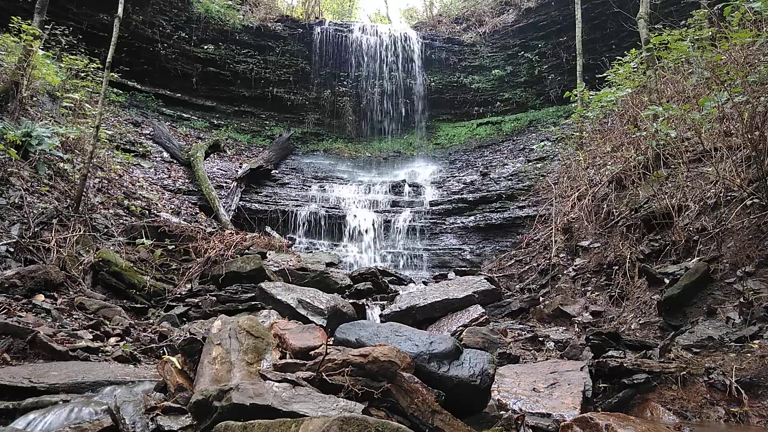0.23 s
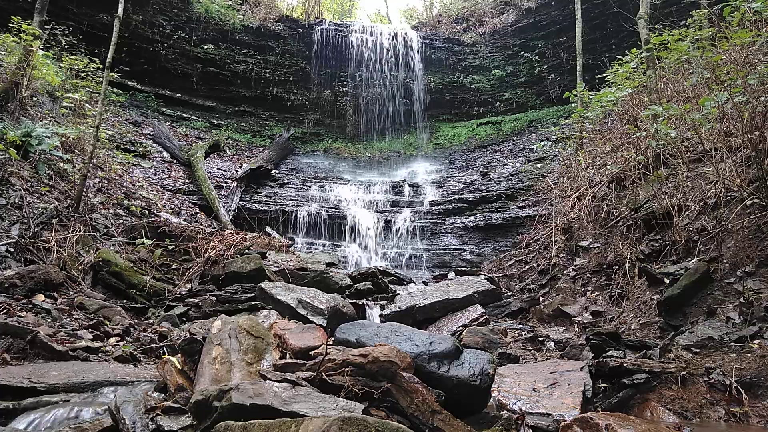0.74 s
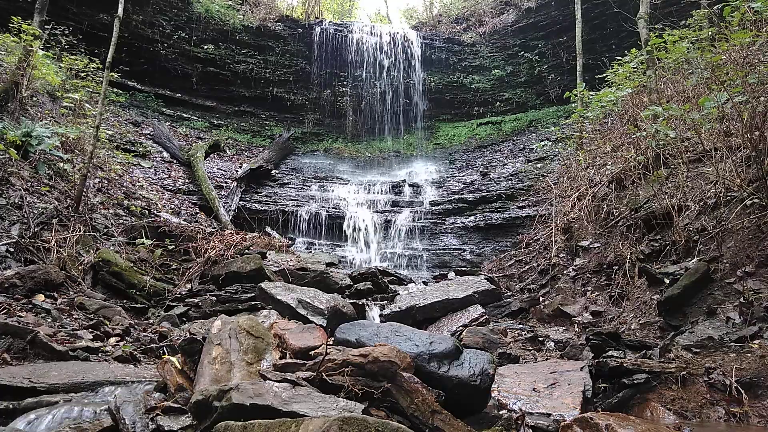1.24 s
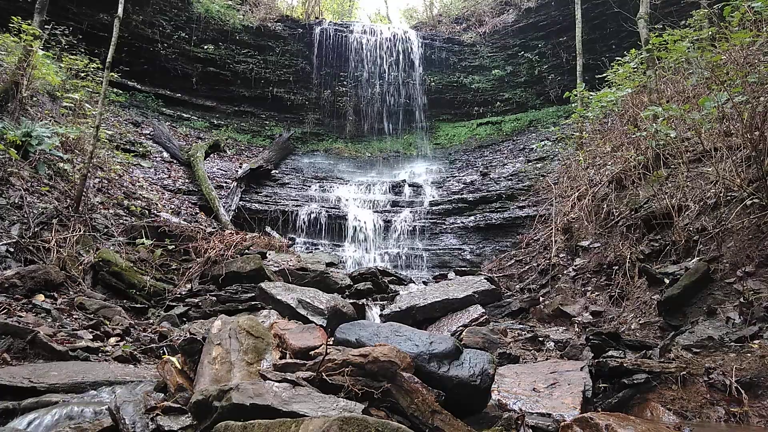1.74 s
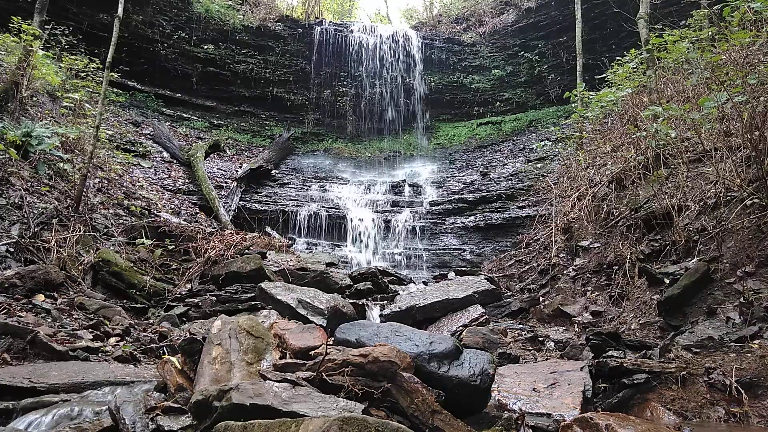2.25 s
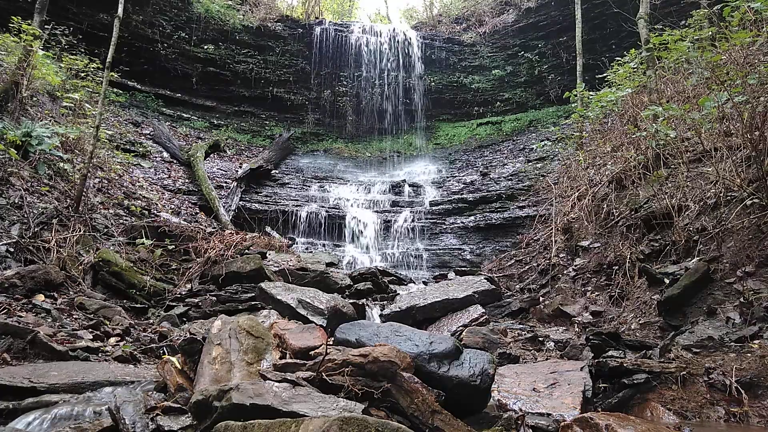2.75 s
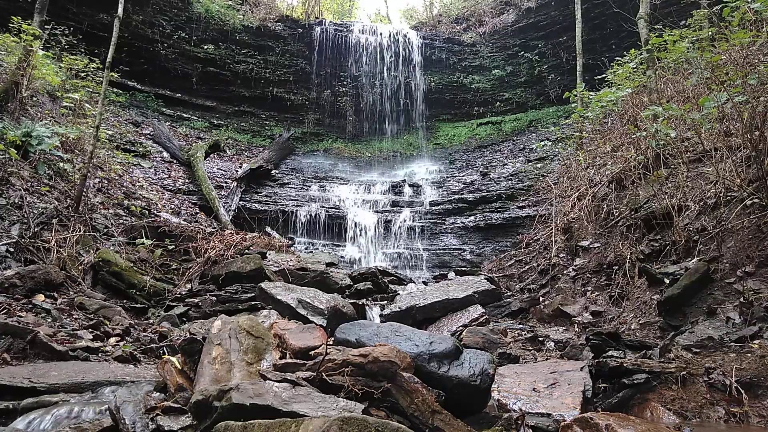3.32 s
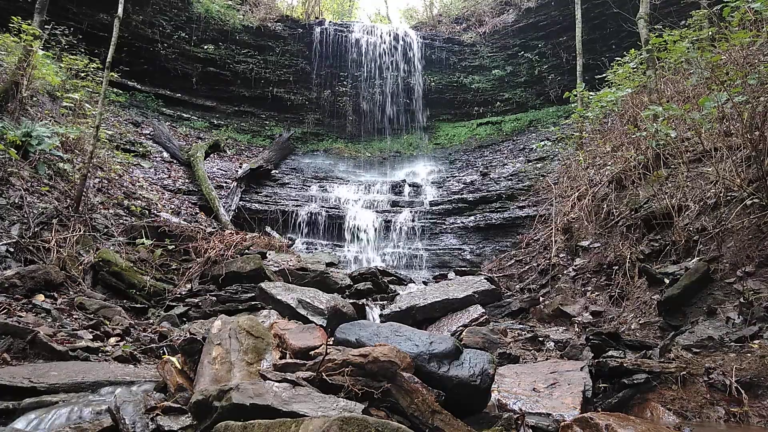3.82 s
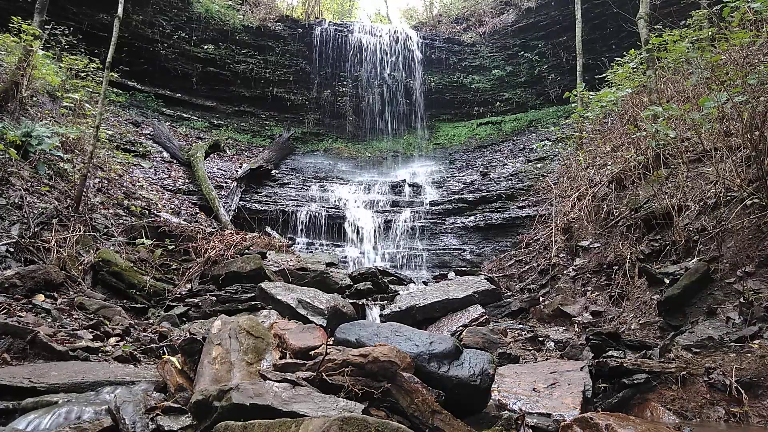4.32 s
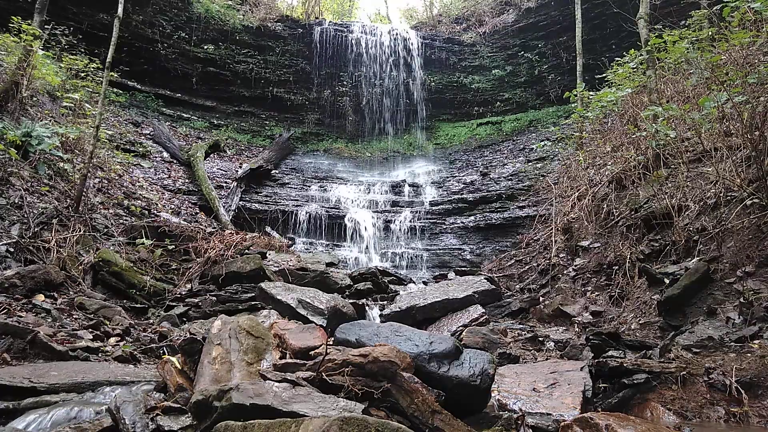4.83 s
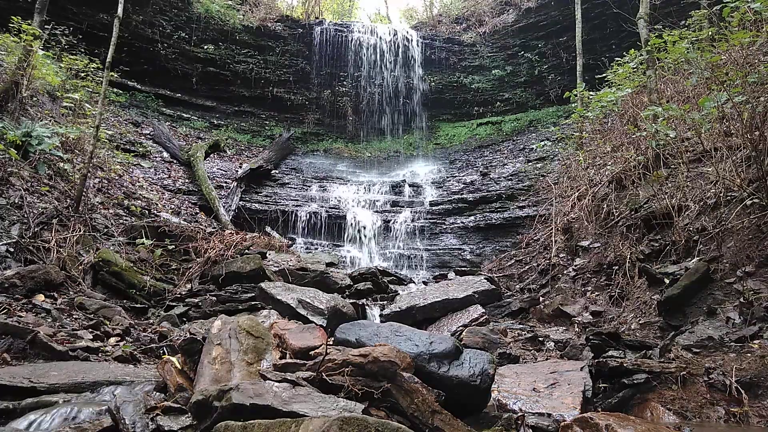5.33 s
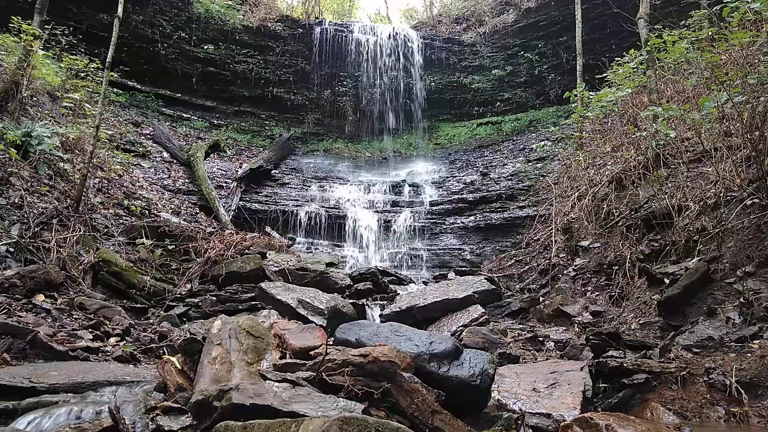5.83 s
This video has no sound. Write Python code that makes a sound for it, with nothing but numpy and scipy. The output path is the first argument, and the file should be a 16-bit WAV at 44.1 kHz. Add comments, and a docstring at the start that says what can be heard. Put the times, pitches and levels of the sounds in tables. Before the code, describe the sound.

A small waterfall splashing on rock ledges starts with a short, loud surge of noise, then quickly sinks to a soft, steady rush that lasts to the end. Faint bubbling and scattered low and high gurgles from a nearer brook come through the hiss. The place is a rocky hollow in the woods, heard in mono through one small microphone with a sharp treble.

```python
"""A steady rush of water cuts in; its volume swells for a moment, then sinks to a much quieter, steady level.
It is a small waterfall some way off, where countless splashes on rock ledges blend into a hiss. Nearer, a brook
gurgles between stones as pockets of air ring in the water. One small microphone with a sharp treble resonance
hears it all."""
import sys
import numpy as np
from scipy import signal
from scipy.io import wavfile

SR = 44100
rng = np.random.default_rng(int(sys.argv[2]) if len(sys.argv) > 2 else 0)


def file_out(sig):
    """Save sig as 16-bit WAV at sys.argv[1]."""
    # one column per channel
    cols = np.atleast_2d(sig).T
    # limit, then scale
    lim = np.clip(cols, -1, 1)
    pcm = np.round(lim * 32767).astype(np.int16)
    wavfile.write(sys.argv[1], SR, pcm)


N = 267422
TIME = np.arange(N) / SR
START_S = 0.07   # silence until here


def waterfall(level_db, surge_db, patchy_db):
    """Countless splashes blur into bands of noise that surge together; low bands come in patches."""
    # tone of the splashes: (frequency [Hz], relative level [dB])
    splash_tone = [(20, -26), (55, -18), (100, -13), (160, -2.5), (215, -11.5), (300, -7), (430, -10.5),
                   (600, -8.5), (1300, -9), (2500, -11.5), (4500, -14.5), (7000, -14), (9200, -17.5),
                   (17000, -17.5)]
    tone_hz, tone_db = np.array(splash_tone).T
    edges_hz = 20 * 2 ** np.arange(0, 9.9, 1 / 3)   # three bands to an octave
    out, surge = 0, drift(4.0)
    noise = rng.standard_normal((2, N))   # neighbouring bands get unrelated noise
    for k, (low, high) in enumerate(zip(edges_hz, edges_hz[1:])):
        band = signal.sosfilt(signal.butter(2, [low, high], "band", fs=SR, output="sos"), noise[k % 2])
        hz = np.sqrt(low * high)
        band_db = np.interp(np.log(hz), np.log(tone_hz), tone_db)
        patch_db = patchy_db / (1 + hz / 1500) * drift(13.6)
        out = out + from_db(band_db + surge_db * surge + patch_db) * band
    return from_db(level_db) * rms_one(out)


def brook_glugs(weak_count, weak_db, low_hz, high_hz):
    """Each glug is a clump of bubbles of similar size; weaker glugs come at random."""
    # the loudest air pockets in the brook: (time [s], pitch [Hz], main bubble's peak level [dB])
    loud_glugs = [(0.92, 775, -46), (0.933, 1110, -45), (1.48, 275, -45), (1.532, 290, -51),
                  (1.632, 602, -43), (1.759, 285, -50), (2.088, 834, -42), (2.092, 1012, -46),
                  (2.176, 536, -40), (2.242, 516, -44), (2.27, 520, -49), (2.296, 473, -48),
                  (2.323, 336, -50), (2.434, 301, -47), (2.623, 296, -49), (2.629, 470, -50),
                  (2.67, 496, -49), (2.718, 500, -51), (2.765, 1530, -46), (2.938, 322, -48),
                  (3.591, 573, -43), (3.77, 910, -45), (3.955, 600, -49), (4.128, 283, -43),
                  (4.194, 193, -48), (4.228, 285, -43), (4.711, 904, -45), (4.75, 151, -50),
                  (4.802, 150, -48.5), (4.922, 1647, -44), (5.298, 600, -40), (5.688, 635, -43),
                  (5.854, 191, -51), (5.924, 162, -43.5), (6.017, 390, -46)]
    weak_glugs = [(when * N / SR, low_hz * (high_hz / low_hz) ** pitch, weak_db + 3 * (size - .5))
                  for when, pitch, size in rng.random((weak_count, 3))]
    out = np.zeros(N)
    for time_s, hz, peak_db in loud_glugs + weak_glugs:
        cycles = .16 * hz ** .45
        add_bubble(out, time_s + .005, hz, peak_db, cycles, rise=.05)
        for delay, detune in rng.uniform(-1, 1, (3, 2)):   # weaker neighbours roughen the main bubble
            start_s = max(time_s + .015 * delay + .006, 0)
            add_bubble(out, start_s, hz * np.exp(.16 * detune), peak_db - 8, cycles, rise=.05)
    return out


def brook_bubbles(count, quietest_db, spread_db, low_hz, high_hz):
    """Many faint single bubbles ring at random times and pitches."""
    out = np.zeros(N)
    for when, pitch, strength, length in rng.random((count, 4)):
        hz = low_hz * (high_hz / low_hz) ** pitch
        cycles = 0.18 * hz ** 0.445 * (.5 + length)
        add_bubble(out, when * N / SR, hz, quietest_db + spread_db * strength, cycles, rise=0.047)
    return out


def add_bubble(out, start_s, hz, peak_db, cycles, rise):
    """A bubble swells for some cycles, then fades; its pitch climbs as it nears the surface."""
    swell_s = cycles / hz
    t = np.arange(int(6 * swell_s * SR)) / SR
    loudness = t / swell_s * np.exp(1 - t / swell_s)
    tone = np.sin(2 * np.pi * hz * (t + rise * (t - 2 * swell_s) * t / (2 * swell_s)))
    at = min(int(start_s * SR), N - 1)
    out[at:at + len(t)] += (from_db(peak_db) * loudness * tone)[:N - at]


def lingering_hiss(start_s):
    """A few middle bands of noise come in as the swell ends, then fade away."""
    # bands that linger: (centre [Hz], width [Hz], starting level [dB], time to fade by 60 dB [s])
    bands = [(1194, 210, -54, 5.5), (1570, 230, -53, 4), (1360, 1200, -37.5, .3)]
    out, since_s = 0, np.maximum(TIME - start_s, 0)
    for hz, width_hz, level_db, fade_s in bands:
        band_pass = signal.butter(3, [hz - width_hz / 2, hz + width_hz / 2], "band", fs=SR, output="sos")
        hiss = rms_one(signal.sosfilt(band_pass, rng.standard_normal(N)))
        out = out + hiss * from_db(level_db - 60 * since_s / fade_s)
    return out * (TIME > start_s)


def swell(sink_at_s, sink_for_s, bend):
    """The volume climbs, holds, then sinks: early if bend is under 1, late if it is over 1."""
    start_share, fade_in_s = 0.15, 0.22
    swell_db, creep_db_per_s = 18, 0.0521   # height above the steady level; a very slow rise throughout
    fade_in = np.clip(start_share + (1 - start_share) * (TIME - START_S) / fade_in_s, 0, 1)
    sunk = np.clip((TIME - sink_at_s) / sink_for_s, 0, 1) ** bend
    return fade_in * from_db(swell_db * (1 - sunk) + creep_db_per_s * TIME)


def drift(rate_hz):
    """A slow random wobble, about 1 in size: smoothed noise with one value every 40 samples."""
    r = np.exp(-80 * np.pi * rate_hz / SR)
    slow = signal.lfilter([1], [1, -2 * r, r * r], rng.standard_normal(N // 40 + 2002))[2000:]
    return np.interp(np.arange(N) / 40, np.arange(len(slow)), rms_one(slow))


def from_db(db):
    """Turn decibels into a number to multiply by."""
    return 10 ** (np.asarray(db) / 20)


def rms_one(x):
    """Scale a signal to an average power of 1."""
    return x / np.sqrt(np.mean(x ** 2) + 1e-20)


def scene():
    """Waterfall and brook run steadily while the volume swells; the range below 5000 Hz sinks just before the
    treble."""
    water = waterfall(level_db=-46, surge_db=0.48, patchy_db=2.5)
    water += brook_glugs(weak_count=40, weak_db=-52, low_hz=203, high_hz=2155)
    water += brook_bubbles(count=1200, quietest_db=-64.0, spread_db=8.9, low_hz=249.9, high_hz=3450)
    low = signal.sosfiltfilt(signal.butter(14, 5000, fs=SR, output="sos"), water)
    treble = water - low
    low = low * swell(sink_at_s=0.696, sink_for_s=0.095, bend=0.67)
    treble = treble * swell(sink_at_s=0.721, sink_for_s=0.096, bend=1.5)
    return np.tile(low + treble + lingering_hiss(start_s=.7), (2, 1))   # same on left and right


def record(dry):
    """Air behind the microphone's opening rings and lifts a treble band; the very top is cut off."""
    ring_hz, width_hz, cutoff_hz = 11380, 1640, 15720
    r = np.exp(-np.pi * width_hz / SR)
    cavity = [1, -2 * r * np.cos(2 * np.pi * ring_hz / SR), r * r]
    heard = signal.lfilter([sum(cavity)], cavity, dry)   # the bass passes unchanged
    top_cut = signal.ellip(14, .3, 75, cutoff_hz, fs=SR, output="sos")
    return signal.sosfilt(top_cut, heard * (TIME > START_S))


dry = scene()
out = record(dry)
file_out(out)
```